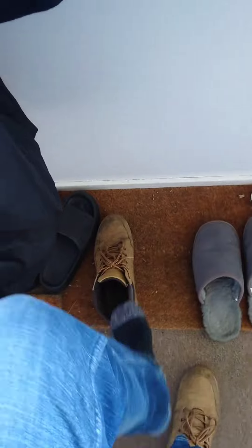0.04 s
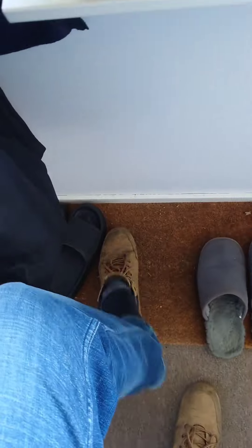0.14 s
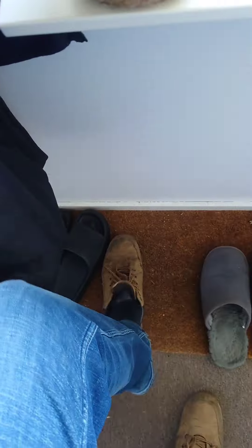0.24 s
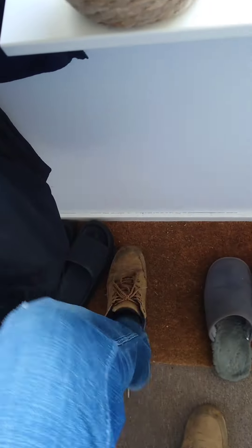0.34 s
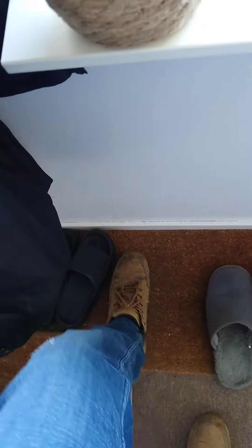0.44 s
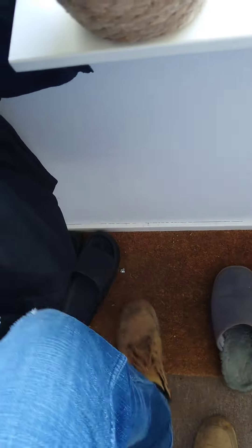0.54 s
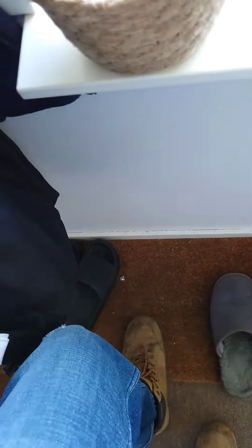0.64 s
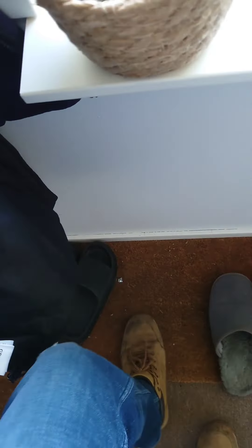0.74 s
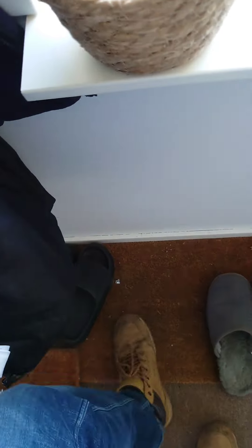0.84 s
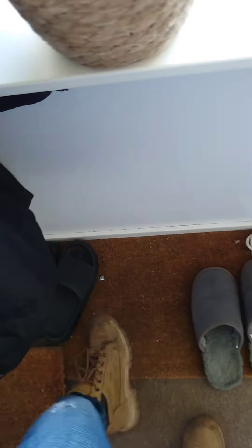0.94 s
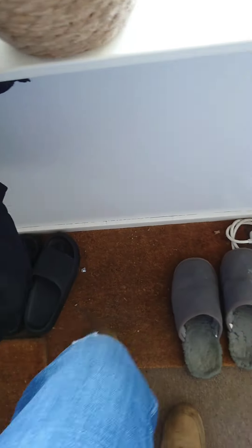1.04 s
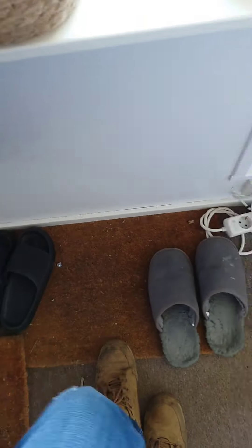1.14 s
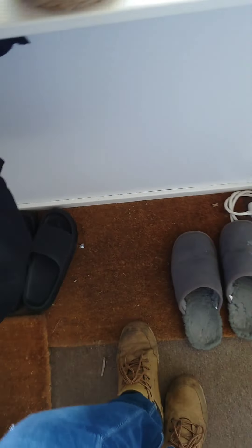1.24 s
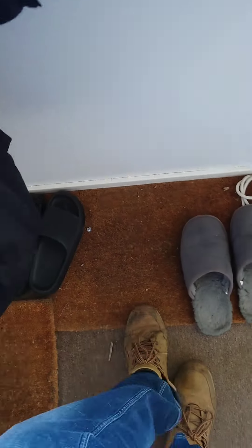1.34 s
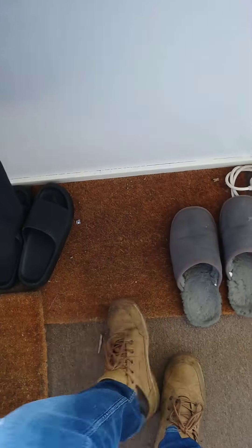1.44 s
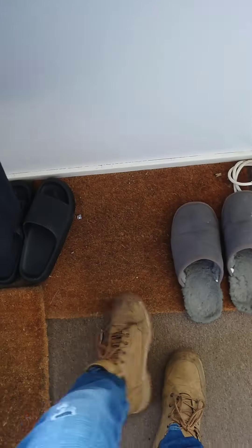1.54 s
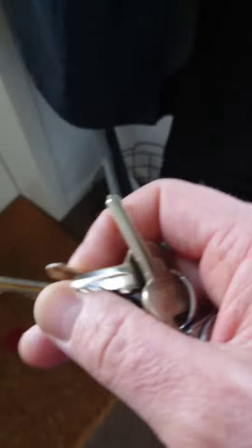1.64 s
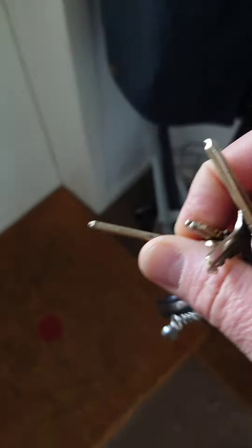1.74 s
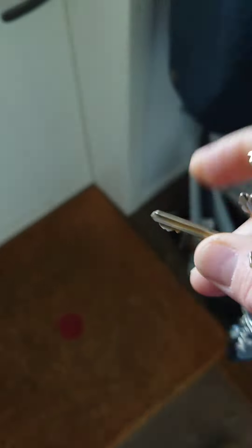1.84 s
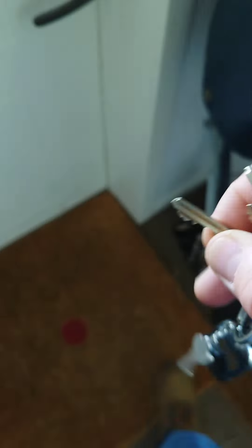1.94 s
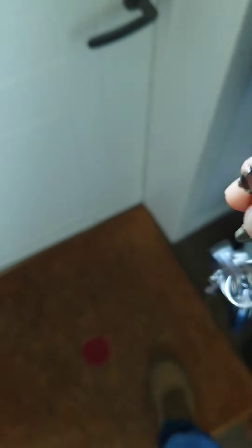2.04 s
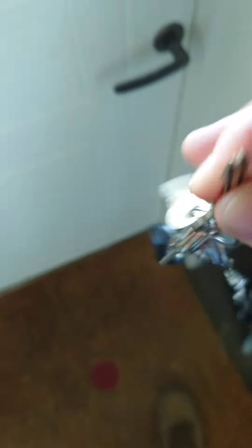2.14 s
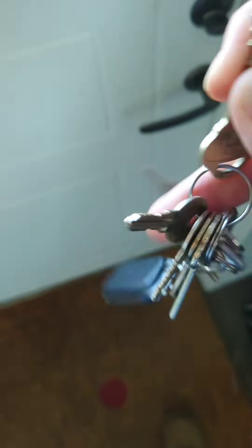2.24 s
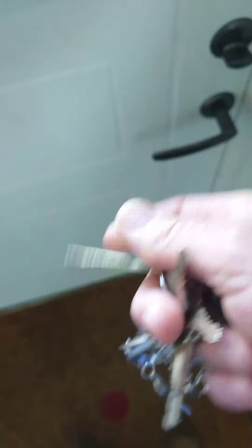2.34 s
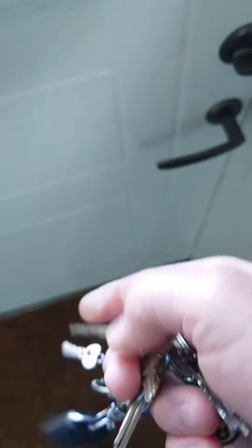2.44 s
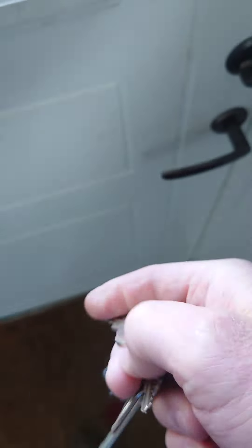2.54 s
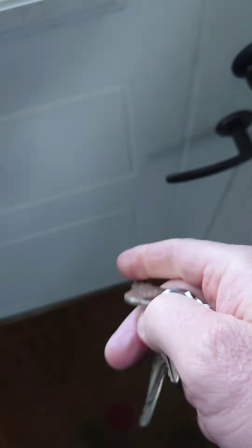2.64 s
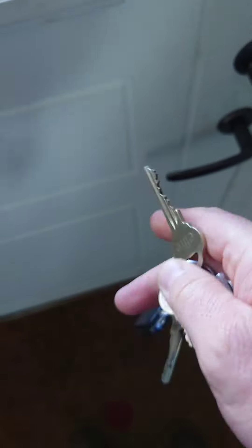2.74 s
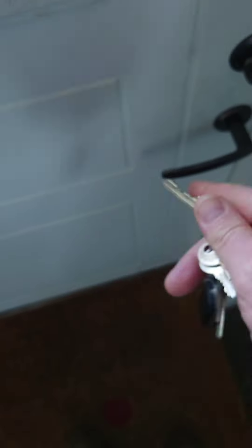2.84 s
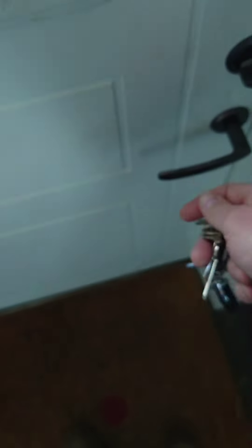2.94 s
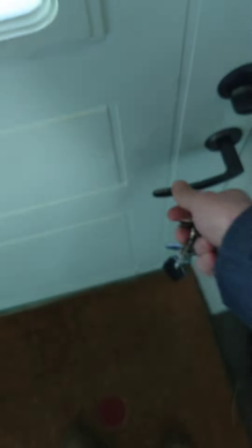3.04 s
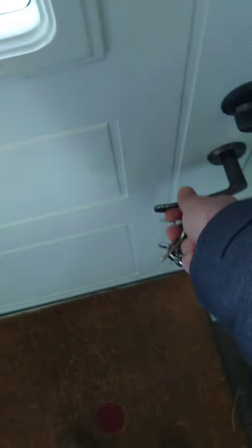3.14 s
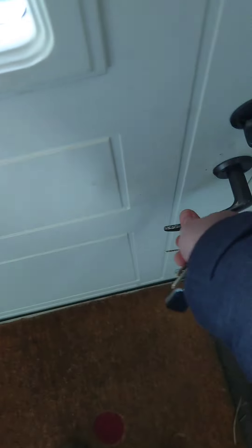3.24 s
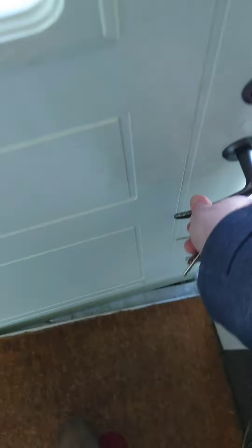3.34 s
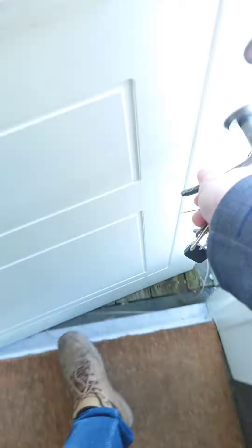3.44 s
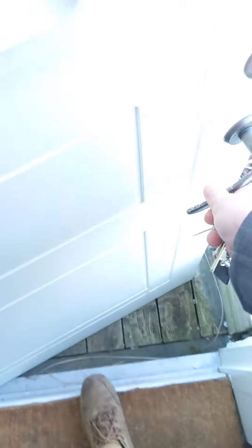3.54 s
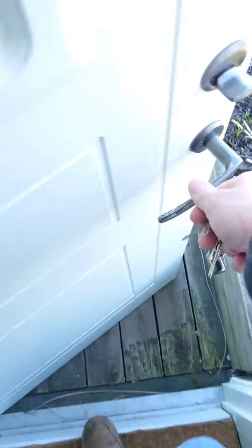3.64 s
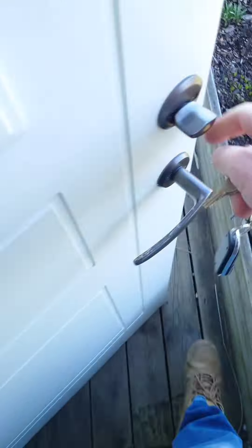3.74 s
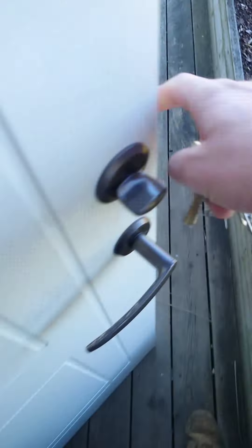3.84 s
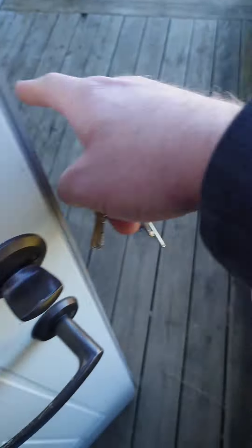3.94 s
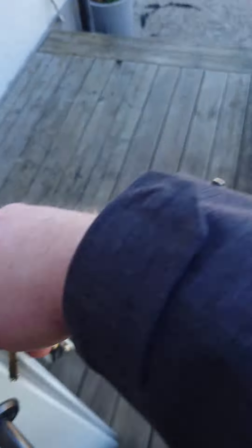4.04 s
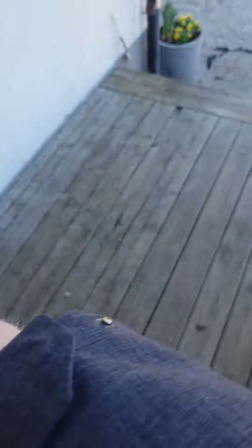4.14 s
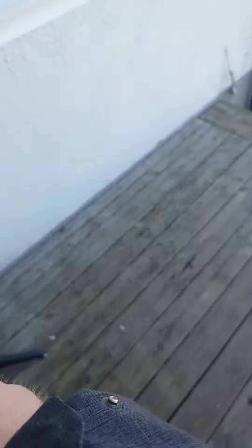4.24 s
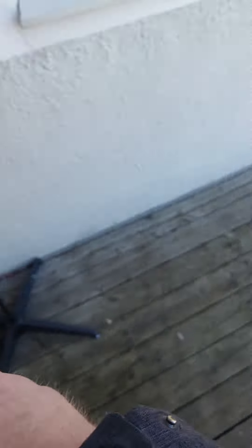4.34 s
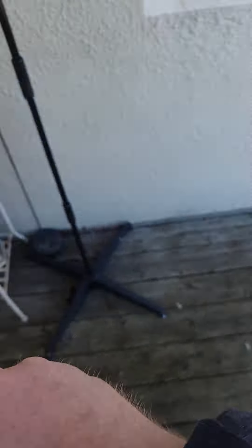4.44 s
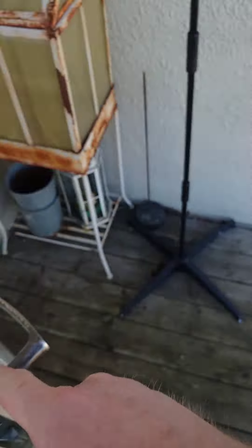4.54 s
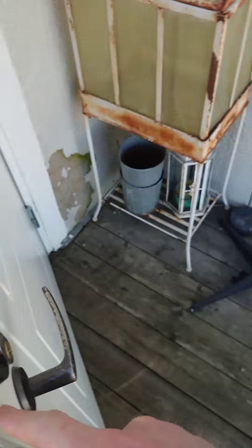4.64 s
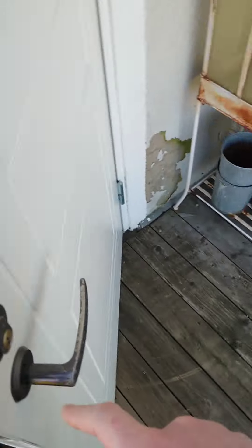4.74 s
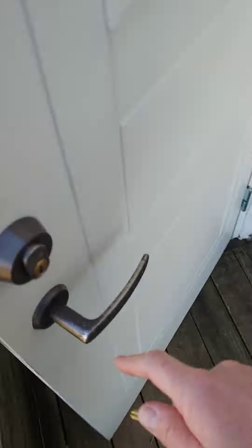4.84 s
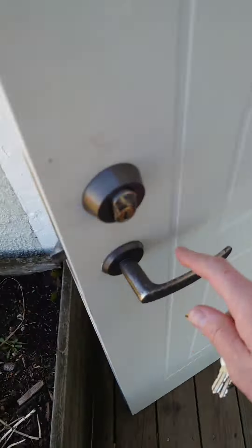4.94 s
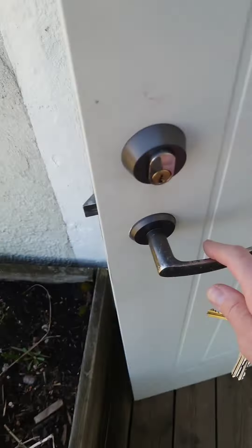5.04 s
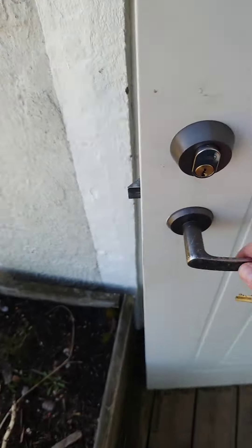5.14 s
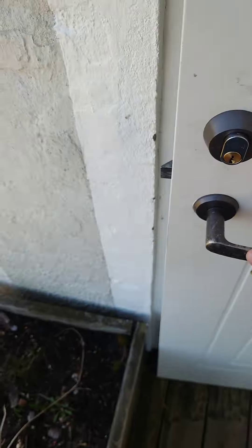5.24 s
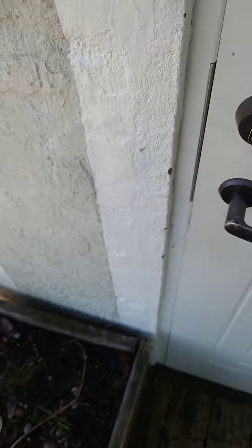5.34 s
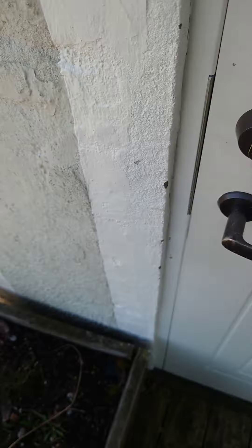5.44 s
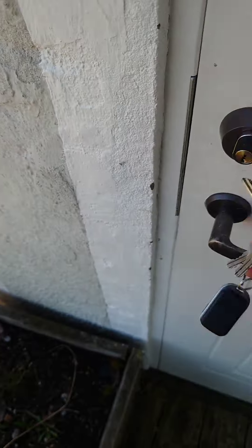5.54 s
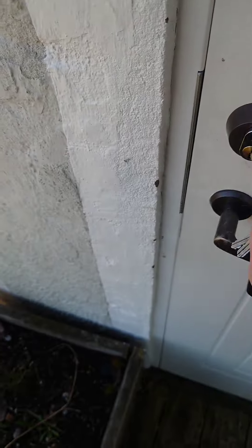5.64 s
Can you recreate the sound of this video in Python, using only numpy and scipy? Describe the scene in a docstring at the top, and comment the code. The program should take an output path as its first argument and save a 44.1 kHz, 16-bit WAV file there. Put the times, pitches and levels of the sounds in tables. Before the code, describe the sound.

Close clothing rustle, soft steps and jingling keys, followed by a clacking door handle, a short squeak and a door closing with a thump.

```python
"""Clothes rustle and a foot slides into a boot in a small hall. A bunch of keys jangles, the front door
handle clacks, and someone steps onto a wooden deck and pushes the door shut: it squeaks, thumps into its
frame and the latch snaps. Impacts excite low modes in wood and high modes in metal; stick-slip friction
makes the squeaks. Jacket and jeans rub all along, close to the phone in the person's hand."""
import sys
import numpy as np
from scipy import signal
from scipy.fft import rfft, irfft
from scipy.io import wavfile
from scipy.ndimage import uniform_filter1d

SR = 44100
rng = np.random.default_rng(int(sys.argv[2]) if len(sys.argv) > 2 else 0)


def file_out(sig):
    """Save sig as 16-bit WAV at sys.argv[1]."""
    # one column per channel
    cols = np.atleast_2d(sig).T
    # limit, then scale
    lim = np.clip(cols, -1, 1)
    pcm = np.round(lim * 32767).astype(np.int16)
    wavfile.write(sys.argv[1], SR, pcm)


N = 250488
TIME = np.arange(N) / SR
AGE = np.arange(SR // 3) / SR  # time since an impact
TOP_HZ = 15900  # upper band edge


def undb(db):
    """Decibels to amplitude ratio."""
    return 10 ** (np.asarray(db) / 20)

def unit(x):
    """Normalise to rms 1."""
    return x / np.sqrt(np.mean(x ** 2))

def crest(x):
    """Normalise the loudest 3 ms to rms 1."""
    return x / np.sqrt(uniform_filter1d(np.mean(x ** 2, axis=0), 132).max())

def sides(pan_db):
    """Channel gains for a level difference; pan is left minus right."""
    gains = undb(np.array([pan_db, -pan_db]).reshape(2, -1) / 2)
    return gains / gains.mean(axis=0)

def delay(x, left=0, right=0):
    """Path difference: the farther microphone lags by some samples."""
    return np.array([np.roll(x[0], left), np.roll(x[1], right)])

def curves(table):
    """Linear interpolation of each column in time."""
    times, *columns = np.transpose(table)
    return [np.interp(TIME, times, column) for column in columns]

def strokes(table, order=2):
    """Bell-shaped envelopes of rubbing strokes; a higher order flattens the top."""
    return sum(undb(db) * np.exp(-2 * np.abs((TIME - t) / width) ** order) for t, db, width in table)

def fade(t60):
    """Free decay, 60 dB in t60 seconds."""
    return np.exp(-np.log(1000) * AGE / max(t60, 1e-3))

def rise(swell):
    """Exponential build-up with a time constant in seconds."""
    return 1 - np.exp(-AGE / max(swell, 1e-4))

def noise(size, coherence):
    """White noise, partly common to both microphones."""
    left, right, shared = rng.standard_normal((3, size))
    return np.sqrt(1 - coherence) * np.array([left, right]) + np.sqrt(coherence) * shared

def drift(rate):
    """Random modulation through `rate` new values a second."""
    values = rng.standard_normal(4096)
    return 2.67 * np.interp(TIME * rate, np.arange(len(values)), values)

def cut(x, hz, kind, order=4):
    """Low-pass or high-pass filter."""
    return signal.sosfilt(signal.butter(order, hz, kind, fs=SR, output="sos"), x)

def band(x, low_hz, high_hz, order=2):
    """High-pass and low-pass in cascade."""
    return cut(cut(x, low_hz, "high", order), high_hz, "low", order)

def colour(x, spectrum, size=4096):
    """Minimum-phase filter through (f/Hz, level/dB) points."""
    hz, db = np.transpose(spectrum)
    bins = np.maximum(np.arange(size // 2 + 1) * SR / size, 1)
    cepstrum = irfft(np.log(undb(np.interp(np.log(bins), np.log(hz), db))))
    cepstrum[1:size // 2] *= 2
    cepstrum[size // 2 + 1:] = 0
    response = irfft(np.exp(rfft(cepstrum)))
    return signal.fftconvolve(x, response[None], axes=1)[:, :x.shape[1]]

def ring(hz, t60, swell):
    """A damped normal mode, with its own phase at each microphone."""
    return np.sin(2 * np.pi * (hz * AGE + rng.random((2, 1)))) * fade(t60) * rise(swell)

def chatter(t60, swell, rough_db):
    """Contact bounce: tiny uneven impacts merge into decaying noise."""
    uneven = undb(rough_db * np.repeat(rng.standard_normal(len(AGE) // 49), 49))
    return noise(len(AGE), 0.04) * uneven * fade(t60) * rise(swell) ** 2

def push(hz, swell, steepness):
    """A soft contact drives a heavily damped mode; returns tone and envelope."""
    age = AGE / max(swell, 1e-3)
    envelope = (age * np.exp(1 - age)) ** steepness
    return envelope * np.sin(2 * np.pi * hz * AGE), envelope

def add(out, t, sound):
    """Superpose a sound from time t."""
    start = int(t * SR)
    part = sound[:, :N - start]
    out[:, start:start + part.shape[1]] += part


# the door meets its seal, then seats in the frame: t/s, level/dB, f/Hz, swell/s
DOOR_IMPACTS = [(5.338, -2.5, 150.7, 0.0092), (5.365, -12.5, 157, 0.0053), (5.386, -6, 83.5, 0.01)]

def door_slam(leaf_db=-19):
    """Plate vibration: the door leaf booms on impact and its higher modes rumble on."""
    out = np.zeros((2, N))
    for t, db, hz, swell in DOOR_IMPACTS:
        boom, _ = push(hz, swell, steepness=3.7)
        leaf = crest(cut(noise(len(AGE), 0.84), 330, "low", order=2) * fade(t60=0.2))
        add(out, t, undb(db) * (boom + undb(leaf_db) * leaf))
    return out


# impacts of handle and latch: t/s, level/dB, treble/dB, clang/dB, second strike/dB
LOCK_IMPACTS = [(3.218, -22.5, -6, 7.5, 4), (3.261, -20, -18, -9.5, 2), (3.409, -21.5, -17.5, -8, -27),
                (3.638, -22.5, -7, 5, -9), (5.354, -27, -8, 2, 1), (5.38, -23.5, -4.5, -5, 2.5),
                (5.453, -42.5, -21, -3, -9), (5.661, -41.5, 7.5, -9, -12)]
# modes of lock case and door leaf: f/Hz, level/dB
CASE_MODES = [(205, -1), (265, 1), (334, 3), (461, 0), (643, 2), (747, -2), (928, -6), (1217, -6),
              (1850, -6), (2030, -7), (2385, -8), (3595, -11), (4140, -11)]
# spectrum of the lock's chatter: f/Hz, level/dB
LOCK_SPECTRUM = [(100, -15.5), (250, -8.5), (600, -0.5), (1080, -5.5), (1850, -7.5), (3000, -14),
                 (3700, -12), (5250, -12), (6900, -23.5), (8100, -15.5), (16000, -29)]

def lock(gain_db=-1, backlash_s=0.0098, swell=0.0014, t60=0.065):
    """Backlash: the parts strike twice as their play is taken up; the low modes ring longest."""
    out = np.zeros((2, N))
    for t, db, treble_db, clang_db, second_db in LOCK_IMPACTS:
        for lag, strike_db in ((0, 0), (backlash_s, second_db)):
            clang = band(colour(chatter(t60, swell, 1.84), LOCK_SPECTRUM), 1200, 4280, order=4)
            body = cut(colour(chatter(t60, swell, 3.1), LOCK_SPECTRUM), 2560, "low")
            crack = crest(body + undb(clang_db) * clang)
            tick = crest(cut(colour(chatter(0.56 * t60, swell, 1.8), LOCK_SPECTRUM), 2930, "high"))
            case = sum(undb(rng.normal(mode_db, 2.6)) * ring(hz, 0.086 * np.sqrt(1000 / hz), swell)
                       for hz, mode_db in CASE_MODES)
            clack = crack + undb(treble_db) * sides(-4) * tick + undb(-4) * crest(case)
            add(out, t + lag, undb(db + strike_db + gain_db) * clack)
    return out * sides(-3.5)


# the latch rubs over the strike plate: t/s, level/dB, half-width/s
LATCH_STROKES = [(3.35, -42, .05), (3.403, -38, .012), (3.62, -46, .015)]

def latch_slide():
    """Sliding friction of metal on metal gives a gritty band of noise."""
    grit = noise(N, 0.21) * undb(2 * drift(560))
    return strokes(LATCH_STROKES) * unit(band(grit, 1300, 2700)) * sides(-5)


def squeak(start, length, glide_hz, attack, release, harmonics_db, jitter, flutter_db):
    """Stick-slip oscillation of dry metal: a gliding, wavering harmonic series."""
    hz = np.interp(TIME, [start, start + length], glide_hz)
    envelope = np.clip((TIME - start) / attack, 0, 1) * np.clip((start + length - TIME) / release, 0, 1)
    phase = 2 * np.pi * np.cumsum(hz * (1 + jitter * drift(370))) / SR
    tone = np.zeros((2, N))
    for k, db in enumerate(harmonics_db, 1):
        amplitude = undb(db + flutter_db * np.sqrt(k) * drift(70))
        tone += amplitude * np.sin(k * phase + 2 * np.pi * rng.random() + rng.random((2, 1)))
    return tone * envelope


# hand and foot on door and deck: t/s, level/dB, f/Hz, scuff/dB
WOOD_IMPACTS = [(3.153, -37, 356, -7), (3.194, -37.5, 278, -2), (3.224, -23.5, 431, -1),
                (3.251, -18, 134, -1), (3.277, -19.5, 80, -7), (3.361, -23.5, 76, -7.5),
                (3.392, -25.5, 69.5, -9), (3.644, -46, 474, -12), (3.873, -16, 511, -7),
                (3.96, -34.5, 296, -23), (4.088, -39, 295, -3), (4.121, -34.5, 62, -12),
                (4.362, -38.5, 279, -2), (4.395, -39, 70, -3.5), (4.994, -39, 350, -39),
                (5.026, -35.5, 286, -15), (5.45, -33.5, 178, -2.5), (5.663, -35.5, 272, 2.5)]
# higher knocks lie to the right: f/Hz, pan/dB
WOOD_PAN = [(65, 2.5), (350, -7)]

def knocks(gain_db=-1.5):
    """Impact excitation: door leaf and deck boards answer each push with a thud."""
    out = np.zeros((2, N))
    for t, db, hz, scuff_db in WOOD_IMPACTS:
        pan_db = np.interp(hz, *np.transpose(WOOD_PAN))
        add(out, t, undb(db + gain_db) * sides(pan_db) * thud(hz, scuff_db))
    return out


# spectrum of a scuffed surface: f/Hz, level/dB
SCUFF_SPECTRUM = [(100, -6.5), (300, 1.5), (1200, -5.5), (1900, -10.5), (3200, -28), (6000, -25.5),
                  (12000, -37)]

def thud(hz, scuff_db):
    """A soft blow drives one low mode, a spread of board modes around it and friction noise."""
    swell = 0.0095 * (hz / 130) ** -.42  # stiffer contacts are shorter and higher
    tone, envelope = push(hz, swell, steepness=1.17)
    boards = cut(noise(len(AGE), 0.97), 0.48 * hz + 220, "low")
    boards = cut(boards, 0.42 * hz, "high", order=2)
    boards = crest(boards * (envelope + fade(t60=0.16)))
    scuff = crest(colour(noise(len(AGE), 1.0), SCUFF_SPECTRUM) * envelope)
    return tone + undb(-4) * boards + undb(scuff_db - 3) * scuff


# hanging keys collide: t/s, level/dB, key
KEY_IMPACTS = [(2.017, -26, "long"), (2.028, -30, "flat"), (2.038, -17.5, "flat"), (2.091, -22.5, "long"),
               (2.113, -27.5, "long"), (2.136, -23.5, "long"), (2.156, -27, "long"), (5.615, -41, "small"),
               (5.649, -44, "small")]
# bending modes of each key: f/Hz, level/dB
KEY_MODES = {"long": [(3310, -27), (8545, 8), (10020, -7), (11920, -9), (12170, -24), (13366, 7),
             (14300, 14.5), (15130, -17), (15420, -6), (15660, -23)], "flat": [(2970, -29), (4530, -16),
             (7330, 3), (8560, -11), (10100, -9), (11300, -9), (12800, -11), (15100, 10), (15500, 6)],
             "small": [(4450, -26), (6570, -8), (12500, -4), (14930, -0.5)]}
# decay of each key: T60/s
KEY_DECAY = {"long": .14, "flat": .06, "small": .08}
# spectrum of brass contacts: f/Hz, level/dB
BRASS_SPECTRUM = [(700, -30), (1900, -2.5), (3000, -12.5), (4100, -7), (6800, -9), (7700, -7.5),
                  (12900, -5), (15500, 6)]

def swinging_keys(gain_db=-1, scatter_db=4, detune=0.0043, swell=0.0013, bunch_t60=0.13, grip_s=2.17):
    """Free vibration: each collision rings a key and the bunch until the fingers close at grip_s, which quickly
    damps the ringing. Collisions later than grip_s are not heard."""
    out = np.zeros((2, N))
    for t, db, key in KEY_IMPACTS:
        modes = sum(undb(rng.normal(mode_db, scatter_db, (2, 1)))
                    * ring(hz * rng.normal(1, detune), KEY_DECAY[key], swell)
                    for hz, mode_db in KEY_MODES[key])
        small_parts = sum(ring(hz, bunch_t60, swell) for hz in rng.uniform(7800, TOP_HZ, size=44))
        hoop = sum(ring(hz, bunch_t60, swell) for hz in rng.uniform(2600, 5200, size=8))
        bunch = crest(small_parts + undb(-8) * hoop)
        tick = crest(colour(chatter(0.016, swell, 7.3), BRASS_SPECTRUM))
        jangle = crest(modes) + undb(-6) * bunch + undb(-8) * tick
        damping_db = 450 * np.maximum(t + AGE - grip_s, 0)
        add(out, t, undb(db + gain_db - damping_db) * jangle)
    return out * sides(-4)


# keys click between the fingers: t/s, level/dB, body/dB
KEY_CLICKS = [(1.693, -34, -13.5), (1.743, -40.5, -8), (1.812, -30, -30), (1.852, -49, 5),
              (1.8959, -40.5, -3), (1.951, -42.5, -34), (2.037, -20.5, -40), (2.204, -35, -42),
              (2.275, -42.5, -35), (2.369, -38.5, -26), (2.4228, -42.5, -4.5), (2.6268, -39, -1.5),
              (2.7542, -31, -23), (2.7917, -29.5, -15.5), (2.8488, -34.5, -19), (3.4667, -41, -19),
              (3.606, -43, 6.5), (3.969, -29.5, -20.5), (4.272, -39.5, -0.5), (4.598, -54, 5),
              (5.294, -33, -7), (5.507, -42, -2)]

def gripped_keys(gain_db=1, t60=.042, swell=.001):
    """Damped vibration: a held key gives a scrape and short modes that change with every grip."""
    out = np.zeros((2, N))
    for t, db, body_db in KEY_CLICKS:
        scrape = colour(chatter(t60, swell, 6.5), BRASS_SPECTRUM)
        modes = crest(sum(ring(hz, t60, swell) for hz in rng.uniform(7500, TOP_HZ, size=8)))
        click = crest(cut(scrape, 5500, "high")) + undb(body_db - 1) * crest(cut(scrape, 5500, "low"))
        add(out, t, undb(db + gain_db) * sides(rng.normal(-5, 2)) * (click + undb(-6) * modes))
    return out


# fingers sort through the bunch: t/s, level/dB, half-width/s
KEY_STROKES = [(1.76, -48.5, 0.13), (2.1, -38, 0.091), (2.22, -46, 0.061), (2.4, -38, 0.033),
               (2.61, -39, 0.007), (2.685, -38, 0.024), (2.785, -38, 0.02)]

def grinding_keys(catches_per_s=600, spread_db=5):
    """Shot noise: key slides on key in tiny random catches, each exciting damped modes."""
    catches = (rng.random(N) < catches_per_s / SR) * undb(rng.normal(0, spread_db, N))
    modes = sum(ring(hz, t60=0.018, swell=0) for hz in rng.uniform(8140, TOP_HZ, size=30))
    contact = unit(colour(chatter(0.02, .001, 1.4), BRASS_SPECTRUM)) + undb(-2) * unit(modes)
    grind = unit(signal.fftconvolve(catches[None], contact, axes=1)[:, :N])
    return grind * strokes(KEY_STROKES) * sides(-4)


# boots pressed on and set down in the hall: t/s, level/dB, f/Hz, scuff/dB, floor level/dB
FOOTFALLS = [(0.579, -48.5, 160, 12, -42.5), (0.604, -46.5, 147, -3, -45), (0.95, -28.5, 160, -7.5, -45.5),
             (1.135, -31, 135, -3.5, -43), (1.598, -44, 152, -12, -54), (2.055, -41, 70, -7, -43),
             (2.405, -47, 89, 3, -38.5)]

def steps(floor_hz=75):
    """Impact sound: each step thuds on the mat and sets the floor into a deep shudder."""
    out = np.zeros((2, N))
    for t, db, hz, scuff_db, floor_db in FOOTFALLS:
        shudder = cut(noise(len(AGE), 0.95), floor_hz, "low", order=3) * fade(t60=0.33) * rise(0.0057)
        add(out, t, undb(db) * sides(-6) * thud(hz, scuff_db) + undb(floor_db) * crest(shudder))
    return out


# foot and trouser leg slide into the boot: t/s, level/dB, half-width/s
BOOT_STROKES = [(0.396, -53, 0.048), (0.665, -53.5, 0.01), (0.748, -53.5, 0.018), (0.837, -53.5, 0.025),
                (1.265, -53.5, .05), (1.34, -48.5, 0.05)]

def boot_slides():
    """Sliding friction: sock and denim drag over leather in grainy swishes."""
    grain = noise(N, 0.49) * undb(2 * drift(500))
    return strokes(BOOT_STROKES) * unit(colour(grain, SCUFF_SPECTRUM)) * sides(-4)


# taps on boot leather and door: t/s, level/dB, pan/dB
LIGHT_IMPACTS = [(0.5624, -45.5, -4), (4.597, -46.5, -5), (4.831, -41.5, -9), (4.927, -46, -1)]

def taps():
    """Heavy damping: a light impact leaves only a brief mid-range burst."""
    out = np.zeros((2, N))
    for t, db, pan_db in LIGHT_IMPACTS:
        burst = noise(len(AGE), 0.96) * fade(t60=0.0071)
        add(out, t, undb(db) * sides(pan_db) * crest(band(burst, 380, 2000)))
    return out


# air from the open door, for each microphone: t/s, level/dB, half-width/s
AIR_PUFFS = {"left": [(3.515, -28, 0.032), (3.568, -26, .03)], "right": [(4.04, -34, 0.035),
             (4.68, -38, 0.075)]}

def draught():
    """Wind noise: the pressure of each puff rumbles in one microphone alone."""
    puffs = np.array([strokes(AIR_PUFFS["left"]), strokes(AIR_PUFFS["right"])])
    rumble = cut(cut(noise(N, 0), 60, "high", order=2), 270, "low", order=3)
    return puffs * unit(rumble)


# continuous light rubbing of clothes: t/s, rub level/dB, hiss level/dB
CLOTH_LEVELS = [(0, -64.5, -67.5), (0.5, -61, -66.5), (1.15, -60, -61.5), (1.45, -62.5, -63.5),
                (2.2, -58, -57), (2.6, -71.5, -61.5), (2.9, -61.5, -53), (3.2, -58.5, -58.5),
                (3.4, -53.5, -55.5), (4.5, -67, -54.5), (5.05, -60, -59.5), (5.68, -57, -57.5)]
# sleeve and jacket swish as the arm moves: t/s, level/dB, half-width/s
SLEEVE_STROKES = [(0.03, -58, 0.094), (1.08, -55, .016), (1.27, -55.5, 0.14), (1.56, -61, 0.056),
                  (1.85, -61.5, 0.1), (2.28, -62.5, 0.067), (3.06, -52.5, 0.12), (3.92, -54.5, 0.11),
                  (4.11, -54, 0.023), (4.28, -52.5, 0.092), (4.73, -58, 0.11), (5.25, -53.5, 0.094)]
# spectrum of rubbing cloth: f/Hz, level/dB
CLOTH_SPECTRUM = [(120, -73), (200, -3.5), (278, 5.5), (394, 8.5), (1000, 4.5), (1940, 4), (2250, 4),
                  (6760, -22.5), (8580, -14.5), (16000, -18)]

def clothes(grain_db=0.5):
    """Friction noise: cloth slides in short catches, and single fibres make it grainy."""
    rub_db, hiss_db = curves(CLOTH_LEVELS)
    swish = strokes(SLEEVE_STROKES, order=6)
    fibres = colour(noise(N, 0.05) * undb(grain_db * drift(570) + drift(45)), CLOTH_SPECTRUM)
    rub = unit(cut(fibres, 4000, "low")) * (undb(rub_db) + undb(-4) * swish)
    hiss = unit(cut(fibres, 4870, "high")) * (undb(hiss_db - 0.5) + .5 * swish)
    return rub * sides(-8) + hiss * sides(-17)  # nearest the right microphone


# the hand shifts on the phone: t/s, level/dB
HAND_LEVELS = [(0, -64), (0.2, -73), (1.1, -69.5), (1.9, -81.5), (2.45, -70), (2.7, -84.5), (3.15, -69.5),
               (3.48, -45), (4.3, -57.5), (4.7, -53.5), (5.68, -60)]
# spectrum of its rumble: f/Hz, level/dB
HAND_SPECTRUM = [(25, -3.5), (60, 4), (100, 1.5), (180, 1), (300, -21), (1100, -32.5)]

def handling(lumps_db=3, bumps=70, low_hz=110, high_hz=520):
    """Structure-borne sound: the hand rumbles on the phone; fingers and cuff nudge it at random."""
    hand_db, = curves(HAND_LEVELS)
    rumble = unit(colour(noise(N, 0.57), HAND_SPECTRUM))
    out = rumble * undb(hand_db + 1.5 + lumps_db * drift(23))
    for when, pitch, force in rng.random((bumps, 3)):
        hz = low_hz * (high_hz / low_hz) ** pitch
        bump, _ = push(hz, swell=0.21 / hz, steepness=1)
        db = hand_db[int(when * N)] + 6 * force - 2
        add(out, when * N / SR, undb(db) * sides(-5) * bump)
    return out


def hall(x):
    """Reverberation: a short diffuse tail, weaker once the listener is out on the deck."""
    diffuse = noise(len(AGE), 0.047)
    low = cut(diffuse, 1520, "low") * fade(t60=0.12)
    high = cut(diffuse, 1870, "high") * fade(t60=0.24)
    tail = (low + high) * (AGE > .004)
    send = undb(np.interp(TIME, [3.6, 4.2], [-15, -20]))
    return signal.fftconvolve(x * send, tail / np.sqrt(np.sum(tail ** 2) / 2), axes=1)[:, :N]


def scene():
    """Superposition: door, keys and boots excite the hall; cloth, hand and draught are heard dry."""
    metal = lock() + latch_slide() + gripped_keys() + grinding_keys() + swinging_keys()
    hinge = squeak(start=4.828, length=.064, glide_hz=(1105, 1245), attack=.005, release=.032,
                   harmonics_db=(0, 0, -13), jitter=0.012, flutter_db=0.5)
    latch = squeak(start=5.241, length=.108, glide_hz=(913, 895), attack=.05, release=.01,
                   harmonics_db=(0, -11, -15, -34, -31, -27), jitter=0.0062, flutter_db=1)
    squeaks = undb(-47.5) * sides(-10) * hinge + undb(-31.5) * sides(-6) * latch
    door = delay(door_slam() + knocks(), right=10)
    boots = delay(steps(), left=14) + boot_slides()
    sources = door + boots + taps() + metal + squeaks
    return sources + hall(sources) + clothes() + handling() + draught()


def record(dry):
    """Band limiting: the phone cuts the deepest bass and the highest treble."""
    low_pass = signal.ellip(10, .2, 70, TOP_HZ, fs=SR, output="sos")
    return signal.sosfilt(low_pass, cut(dry, 8.4, "high", order=1))


dry = scene()
out = record(dry)
file_out(out)
```